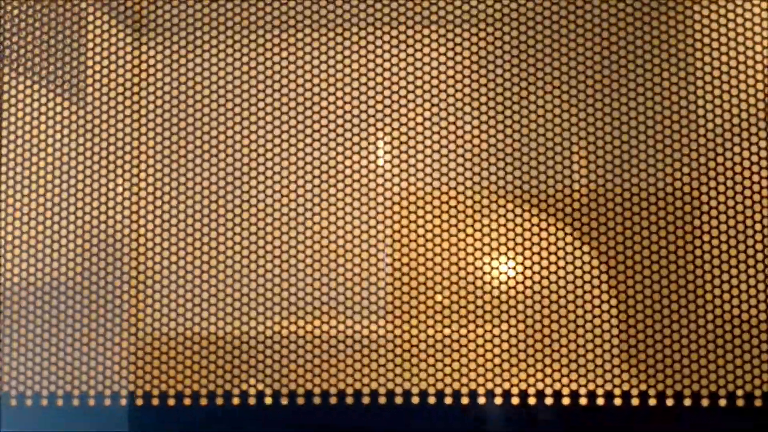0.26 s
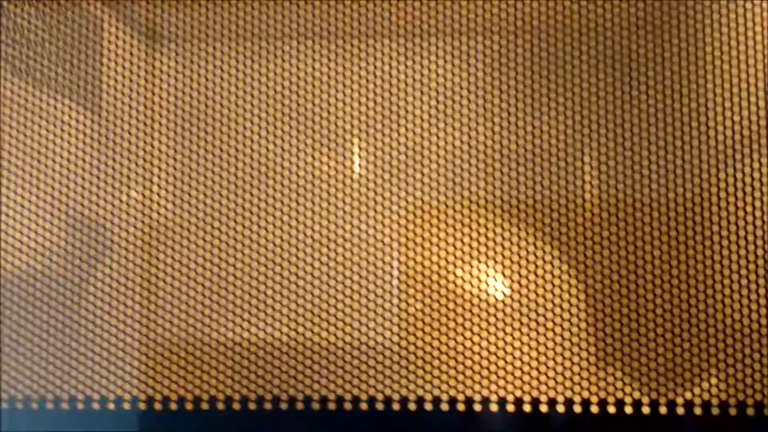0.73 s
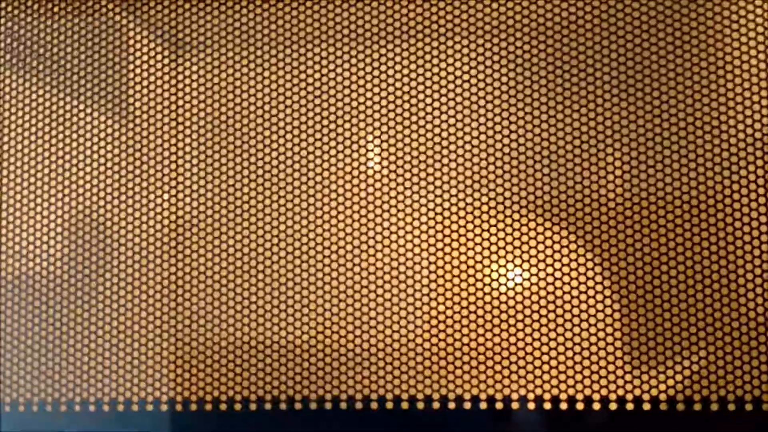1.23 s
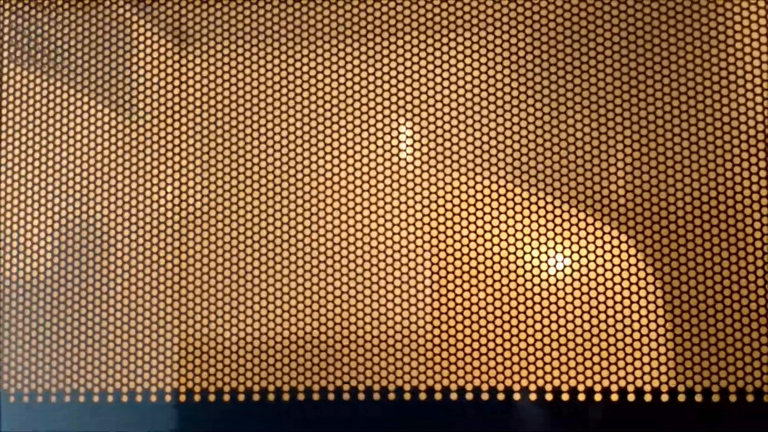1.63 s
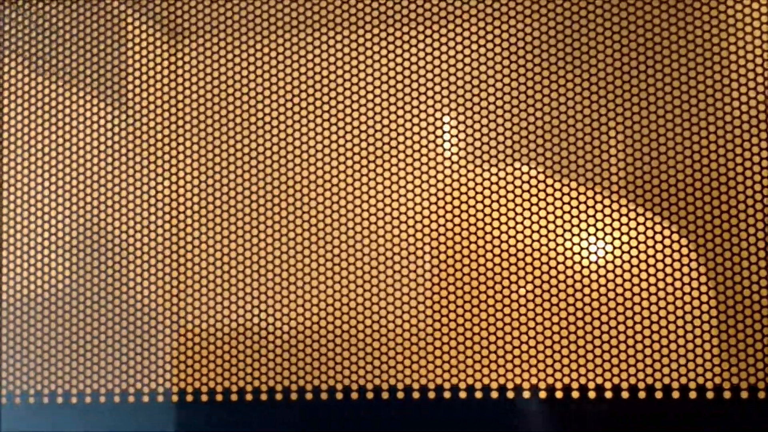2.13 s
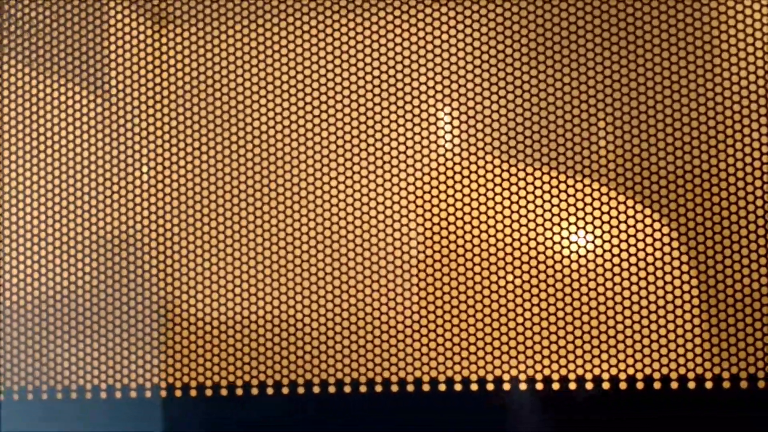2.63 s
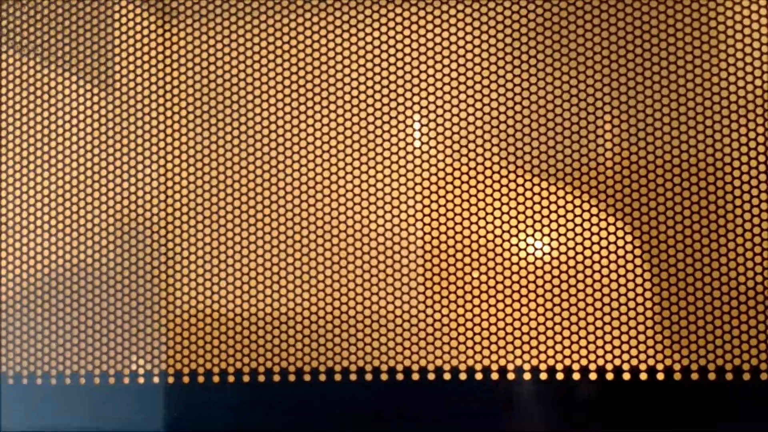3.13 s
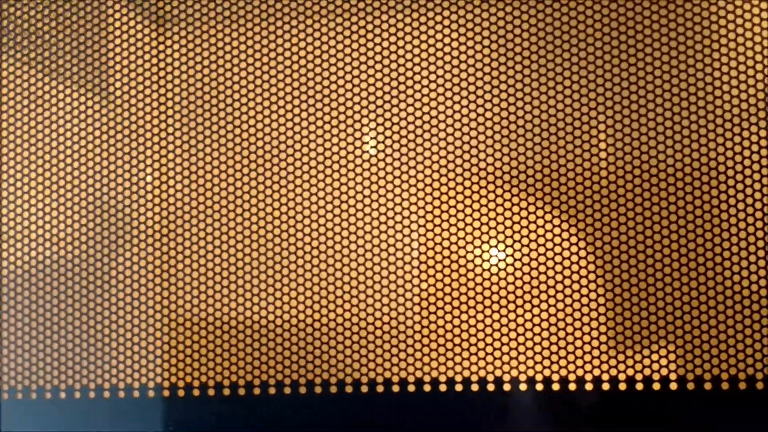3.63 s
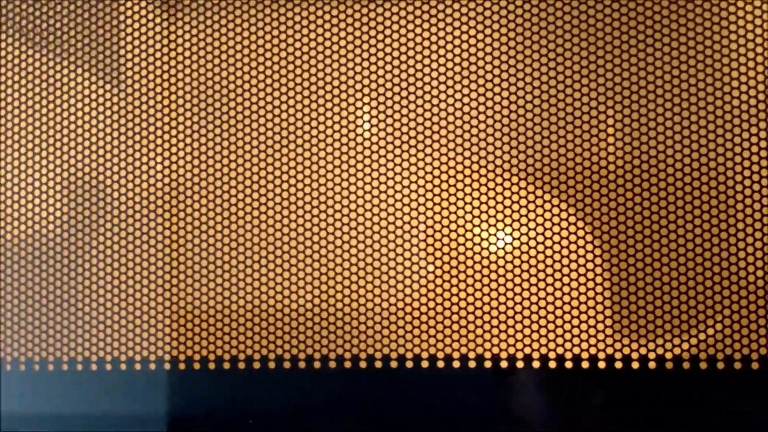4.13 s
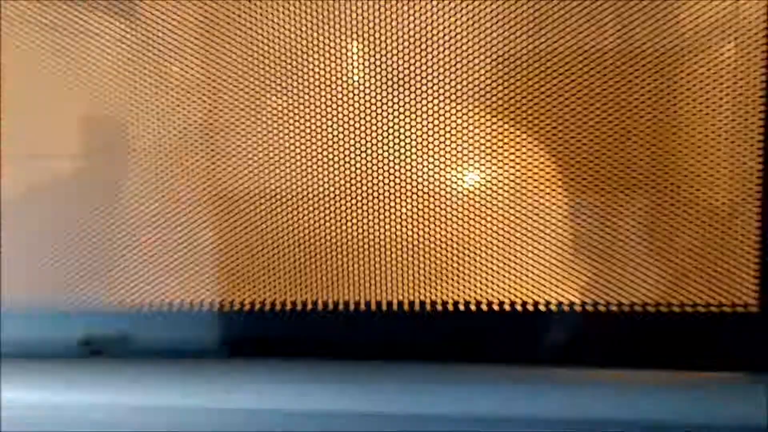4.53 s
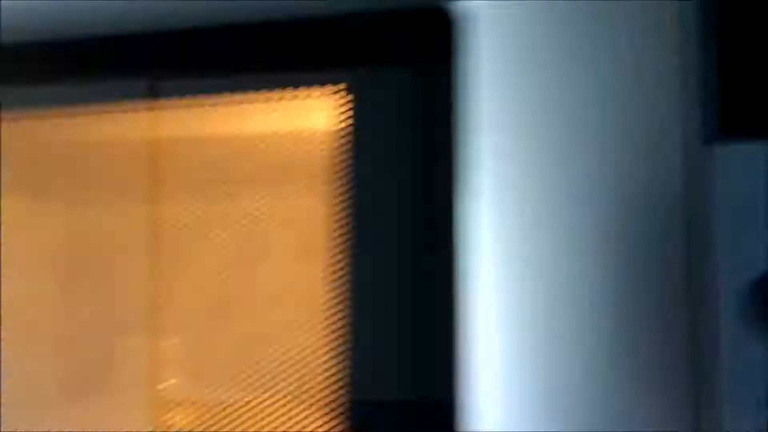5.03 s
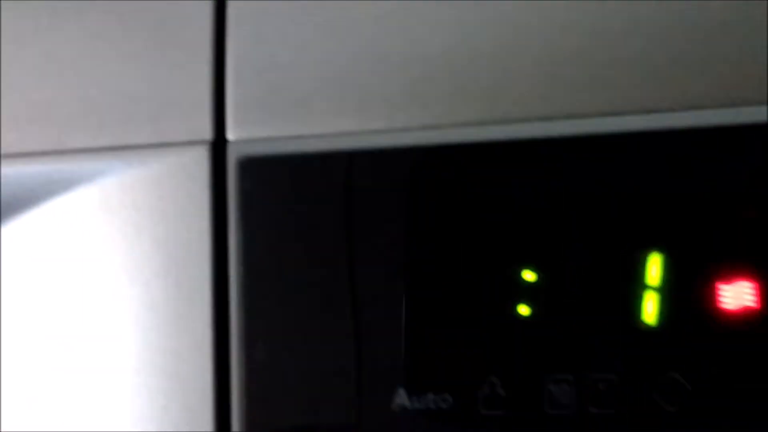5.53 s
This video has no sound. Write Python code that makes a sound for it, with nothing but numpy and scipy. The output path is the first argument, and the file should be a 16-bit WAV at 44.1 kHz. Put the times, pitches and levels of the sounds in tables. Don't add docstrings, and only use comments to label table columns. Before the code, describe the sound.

A stereo microphone near a running microwave catches a bright, buzzy transformer drone with fan whine and hiss at four times normal speed. Short metallic knocks and crackly sprays from a heated egg come singly and in clusters, loudest at the start. After the microphone moves away along the front, pitch falls instantly to true speed, leaving a deep, pulsing hum and dull airflow without pops.

```python
import sys
import numpy as np
from scipy import signal
from scipy.fft import rfft, irfft
from scipy.io import wavfile
from scipy.ndimage import uniform_filter1d

SR = 44100
rng = np.random.default_rng(int(sys.argv[2]) if len(sys.argv) > 2 else 0)


def gain_from_db(level_db):
    decades = np.asarray(level_db, float) / 20
    return 10 ** decades


def unload_wav(signal):
    wavfile.write(
        sys.argv[1],
        SR,
        np.round(np.clip(np.atleast_2d(signal).T, -1, 1) * 32767).astype(np.int16),
    )


N = 254456
STEPS = np.arange(0, N + 128, 128) / SR
FAST = 4
SWITCH_S = 5.306

# frequency in Hz, left and right level in dB per Hz.
FAST_AIR = [(60.3, -96.5, -93), (234, -89, -91), (342, -80.5, -82.5), (600, -71.5, -72),
            (713, -80.5, -83.5), (1044, -70, -68), (1500, -71.5, -67.5), (2070, -71.5, -67.5),
            (2630, -74, -73), (4000, -77.5, -77), (6130, -76.5, -77), (8800, -80, -79.5),
            (12500, -80.5, -80.5), (15500, -85, -85.5)]
# frequency in Hz, left and right level in dB per Hz.
SLOW_AIR = [(40, -82, -83.0), (80, -78, -79), (131, -64, -71), (250, -63.5, -66), (400, -79, -64),
            (704, -68, -69), (1020, -66.5, -65), (1130, -71.5, -71), (1900, -73.5, -73),
            (3530, -80.5, -80.5), (5870, -86.5, -87), (10500, -99.0, -99.0), (11500, -103.0, -103.0),
            (15000, -107, -107)]
# frequency in Hz, width in Hz, boost in dB.
DUCTS = [(850, 170, 5.5), (1984, 210, 3), (2526, 290, 4.5), (4200, 320, 3), (5920, 640, 3), (10800, 540, 2)]
# frequency in Hz, left lead in rad, likeness 0-1.
PORTS = [(30, 3.5, 0.62), (70, 2, 0.85), (115, 2, 0.96), (159, 1.6, 0), (220, 0.22, 0.88),
         (400, -0.1, 0.66), (696, 0.25, 0.6), (920, -0.5, 1), (1400, -2, 0.58), (1730, -.3, 0.85),
         (2150, -.3, 0.72), (2570, -.3, 0.87), (3500, -.3, 0.88), (8000, -.3, 1)]
PORT_DELAY_S = 24.8 / 44100

# frequency in Hz, left and right level in dB, left lead in rad.
SLOW_TONES = [(100.1, -38.0, -39.1, 2.5), (200.2, -40.0, -50.3, 0.3), (246.9, -49.2, -47.3, 0.9),
              (300.5, -41.1, -40.6, 0.1), (356.1, -58.4, -48.6, -0.2), (400.5, -40.0, -39.6, 0.0),
              (498.4, -47.1, -49.6, 0.7), (600.9, -39.5, -45.3, -0.2), (701.7, -53.8, -51.3, -0.8),
              (881.9, -51.9, -51.6, -0.5), (999.0, -51.9, -51.6, -0.6), (1201.4, -55.7, -54.7, -0.9)]
# time in seconds, frequency in Hz.
BUZZ_DRIFT = [(0, 400.35), (2.4, 400.39), (3.6, 400.49), (5.77, 400.5)]
# multiple of the buzz, left and right level in dB,
# left lead in rad, change in dB once the microphone is away.
CORE = [(1, -39.1, -38.1, 3.0, -4), (2, -61, -55, 0, 3), (3, -46.7, -41.6, 0.1, 0.5),
        (4, -33.4, -33.6, -0.3, -4), (5, -38.7, -34, 0, -8), (6, -48.1, -37.5, 0.5, 0.5),
        (7, -58, -52.6, -0.6, -3), (8, -48.2, -47.1, -0.4, -10.5), (10, -54.1, -54.2, -0.2, -3.5),
        (11, -56, -56.9, -0.7, 3), (12, -53.8, -53.9, -1, -2.5), (13, -56.5, -58.5, -1.2, -5.5),
        (20, -57.9, -57.7, 2.4, -0.5)]
# multiple of the buzz,
# left and right level in dB, left lead in rad, change in dB once away.
HALVES = [(2.5, -50.5, -52.3, 0.1, -1.5), (4.5, -55.4, -52.4, 0.4, -4), (33.5, -59.9, -60.1, -2.5, -7.5)]
BLADE_HZ = 705.65
# multiple of the blade rate, left and right level in dB,
# left lead in rad, change in dB once away.
FAN = [(1, -48.1, -48.4, 1.2, -1.5), (1.5, -56, -53.5, -0.1, -9), (2, -60.2, -45.7, 0, -2),
       (3, -46.4, -41.6, -0.7, -9.5), (4, -54.3, -60.5, 0.7, 2), (5, -55.3, -55.1, 0, -3),
       (7, -54, -54.1, -0.9, -5.5)]
# frequency in Hz, left and right level in dB,
# left lead in rad, change in dB once away.
BEATS = [(929.6, -51.2, -48.4, 0.2, 0), (977.5, -54.4, -50.3, 2.8, -1), (1459, -55, -53.6, -0.1, -1.5),
         (1683, -54.5, -53.3, -0.4, -2.5), (1955, -57.4, -50.9, 0, -3), (2049.7, -50.8, -52.9, -0.2, -3)]
# frequency in Hz, left-right change in dB
# once away, left and right change in dB at the panel, lead change in rad at the panel.
STEEP_TONES = [(400, 1.5, 0, 3.5, -0.71), (705, 4.5, 0, -5, 0.58), (800, 2, 14.5, 0, 0),
               (1200, 1.5, 9.5, 7, 0.091), (2002, -8, 2, -2, 0), (2116, -2, 3, -3, 0),
               (2402, 9, 2.5, 2.5, 0), (2770, -1, 15, 8, 0), (3203, -1, -8, -11, 0)]
RIPPLE_RAD, RIPPLE_RATE = 0.75, 1.35

AWAY_S, PANEL_S = (4.47, 4.63), (4.98, 5.144)
LEAN_S, LEAN_WIDTH_S, LEAN = 0.93, 0.42, 0.14
AIR_AWAY_DB, AIR_PANEL_DB = -1.8, -0.5
# time in seconds, level change in dB.
HAND_DRIFT = [(0, -1.5), (.7, -1.5), (1.4, 2), (2.6, -1.5), (3.7, 1.5), (4.2, -0.5), (4.62, -2), (4.95, -1),
              (5.3, -8.5)]

# start in seconds, strength in dB, place across the cavity as a share 0-1.
POPS = [(0.4576, -14.5, .48), (0.618, -30, .21), (1.31, -23, 0.14), (1.3936, -16, 0.3), (1.463, -28.5, .2),
        (1.575, -31, 0.31), (1.678, -19.5, .26), (2.154, -16.5, 0.077), (2.359, -19, .38),
        (2.576, -23.5, 0.41), (2.702, -33, .1), (2.881, -17.5, .43), (2.888, -28, 0.58),
        (2.8963, -20, 0.45), (2.9, -21, 0.076), (3.568, -19, .35), (3.899, -26, 0.36), (3.952, -18.5, 0.26),
        (4.844, -28.5, 0.41), (5.127, -21, .33)]
# start in seconds, shell ring level in dB, ring frequency in Hz,
# spray level in dB, fineness in dB (under 0 spit, over 0 fizz).
SPRAY = [(0.4608, -20, 3930, -15.5, -4), (0.6188, -25.5, 3830, -24, -7), (0.6874, -36, 4180, -30.5, -6),
         (0.7386, -34, 3990, -30, -6), (0.8063, -29.5, 3780, -30, -6), (1.309, -35, 3950, -20, -5.5),
         (1.3955, -23, 3980, -21, 5), (1.5743, -26, 4080, -19.5, 5), (1.678, -38, 4200, -17, 16),
         (2.156, -22.5, 4120, -18, 3.5), (2.361, -31, 3700, -19.5, -4), (2.366, -29, 4200, -21.5, -4),
         (2.5804, -34, 3940, -22.5, 7), (2.6988, -31.5, 3950, -29.5, 3), (2.8832, -24, 4090, -19, 1.5),
         (2.897, -22, 4240, -17.5, -6.5), (2.904, -29, 4220, -20, 7), (3.0593, -30, 4100, -30.5, -5),
         (3.246, -29, 4040, -31, 0), (3.5713, -21, 4080, -17.5, -1), (3.9003, -22.5, 4110, -20.5, -18),
         (3.9557, -24, 4140, -20, -6), (4.1949, -31, 4150, -33.5, 6)]
# frequency in Hz, width in Hz, left and right level in dB.
THUD = [(430, 65, -8.5, -14), (572, 73, -1, -3)]
# frequency in Hz, width in Hz, left and right level in dB.
LOW_KNOCK = [(697, 46, -7.5, -9.5), (873, 52, 1.5, 3.5)]
# frequency in Hz, width in Hz, left and right level in dB.
HIGH_KNOCK = [(1180, 74, 2.5, 5.5), (1410, 410, 6.5, -12), (1690, 220, -3, -16), (2480, 200, -11, -20)]
# frequency in Hz, width in Hz, left and right level in dB.
CRACK = [(1000, 610, 4, 5), (2270, 550, -3, -1.5), (3260, 2900, -27, -10)]
# frequency in Hz, width in Hz, left and right level in dB.
SPIT = [(6840, 350, -8, -19), (7820, 290, -5, -4.5), (8450, 1500, -14.5, -11)]
# frequency in Hz, width in Hz, left and right level in dB.
FIZZ = [(10810, 440, -11, -9), (12900, 870, -27, -8.5), (14000, 530, -12, -18.5)]
BLOW_LAG_S = 0.0015
ECHO_S = 0.0016
BURST_S = 0.0068
LEAK = 0.23
SPIT_RATIO = 2.06


def evened(x):
    return x / np.sqrt(np.mean(x ** 2) + 1e-20)


def columns(table, at):
    place, *values = np.transpose(table)
    return [np.interp(at, place, v) for v in values]


def wander(per_s, count):
    knots = rng.standard_normal((count, 400))
    return np.array([np.interp(STEPS * per_s, np.arange(len(k)), k) for k in knots])


def add(mix, s, sound):
    mix[:, round(s * SR):][:, :sound.shape[1]] += sound


def travel(t):
    lean = LEAN * np.exp(-((t - LEAN_S) / LEAN_WIDTH_S) ** 2)
    return np.interp(t, AWAY_S, [0, 1]), np.interp(t, PANEL_S, [0, 1]) + lean


def ports(hz, speed):
    lead, same = columns(PORTS, hz / speed)
    lead = np.minimum(lead, np.pi - 2 * np.pi * hz / speed * PORT_DELAY_S)
    same = 1 - (1 - same) * (0.42 + 0.78 * speed / FAST)
    return np.exp(-1j * lead), np.clip(same, 0, 1)


def air(table, speed, patchy_db, bumps=(), vent_db=0):
    frames, hz = N // 256 + 5, np.fft.rfftfreq(1024, 1 / SR)
    a, b, c, d, patches = rng.standard_normal((frames, 513, 5)).T
    patches = uniform_filter1d(patches, size=10, axis=0)
    patches = evened(uniform_filter1d(patches, size=12, axis=1))
    lag, same = (v[:, None] for v in ports(hz, speed))
    left = a + 1j * b
    right = lag * (same * left + np.sqrt(1 - same ** 2) * (c + 1j * d))
    logged = [(np.log(f), left_db, right_db) for f, left_db, right_db in table]
    level_db = np.array(columns(logged, np.log(hz + 1)))
    level_db = level_db + sum(db * np.exp(-(2 * (hz - f) / width) ** 2) for f, width, db in bumps)
    panel = np.dot([0.45, 0.6], travel(np.arange(frames) * 256 / SR))
    vent = np.outer(np.exp(-((hz - 3500) / 550) ** 2), panel)
    gain = gain_from_db(level_db[:, :, None] + patchy_db * patches + vent_db * vent)
    z = np.array([left, right]) * gain * np.sqrt(SR / 2) / 23.83
    return signal.istft(z, nperseg=1024, noverlap=768)[1][:, :N]


def locked(hz, buzz_hz):
    multiple = hz / buzz_hz
    near = abs(multiple - round(multiple)) * buzz_hz < 2
    return round(multiple) if near else multiple


def ripple(multiple):
    return RIPPLE_RAD * np.cos(RIPPLE_RATE * (multiple - 5)) / (2 * np.pi)


def tone(t, turns, left_db, right_db, lead):
    controls = gain_from_db(left_db), gain_from_db(right_db), lead
    left, right, lead = (np.interp(t, STEPS, v + 0 * STEPS) for v in controls)
    angle = 2 * np.pi * turns
    return np.sqrt(2) * np.array([left * np.sin(angle), right * np.sin(angle - lead)])


def slow_hum(t):
    buzz_hz = BUZZ_DRIFT[-1][1] / FAST
    quick, out = wander(12, count=len(SLOW_TONES)), 0
    for q, (hz, left_db, right_db, lead) in zip(quick, SLOW_TONES):
        multiple = locked(hz, buzz_hz)
        turns = multiple * buzz_hz * (t - 5.4) + ripple(multiple)
        out = out + tone(t, turns, left_db + 0.71 * q, right_db + 0.65 * q, lead)
    return out


def hum(t):
    buzz_hz = BUZZ_DRIFT[-1][1]
    sources = (CORE + HALVES, buzz_hz), (FAN, BLADE_HZ), (BEATS, 1)
    tones = [(k * unit, *row) for table, unit in sources for k, *row in table]
    cycles = np.cumsum(columns(BUZZ_DRIFT, t)[0]) / SR
    (away, panel), swing_db = travel(STEPS), columns(HAND_DRIFT, STEPS)[0]
    slow, quick = wander(3, count=len(tones)), wander(40, count=len(tones))
    out, moved = np.zeros((2, len(t))), travel(t)[0]
    for k, (hz, left_db, right_db, lead, away_db) in enumerate(tones):
        weak = np.clip((-29.5 - right_db) / 20, 0, 1)
        swings = (1100 < hz < 2200) * (abs(hz - 1600) > 20)
        sway = weak * (2.5 * slow[k] + 0.93 * quick[k]) + swing_db * swings
        steep = (np.array(row[1:]) for row in STEEP_TONES if abs(row[0] / hz - 1) < 0.004)
        tilt, left_panel, right_panel, turn = sum(steep, np.zeros(4))
        left_db = left_db + (away_db + tilt / 2) * away + left_panel * panel
        right_db = right_db + (away_db - tilt / 2) * away + right_panel * panel
        multiple = locked(hz, buzz_hz)
        door = (0.21 * multiple ** 2 + 0.5) % 1 - 0.5
        turns = multiple * cycles + moved * ripple(multiple) + (1 - moved) * door
        out += tone(t, turns, left_db + sway, right_db + sway, lead + turn * panel)
    return out


def ring(drive, modes):
    t, chance = np.arange(len(drive)) / SR, rng.standard_normal((4, 2))
    shapes = 0
    for (hz, width, left_db, right_db), (detune, change) in zip(modes, chance):
        gains = gain_from_db(np.array([left_db, right_db]) + 0.41 * change)
        wave = np.sin(2 * np.pi * hz * (1 + 0.012 * detune) * t)
        shapes = shapes + np.outer(gains, np.exp(-np.pi * width * t) * wave)
    out = signal.fftconvolve(shapes, drive[None], axes=1)[:, :len(t)]
    return out / abs(out).max()


def knock(t, place):
    crackle = rng.standard_normal(len(t)) * (rng.random(len(t)) < 0.12) * np.exp(-t / BURST_S)
    echo = t == t[round(ECHO_S * SR)]
    blow = 0.13 * crackle - (t == 0) - 0.71 * echo
    thud, low, high = np.hypot(np.sin(np.pi * place * np.arange(1, 4)), LEAK)
    out = thud * gain_from_db(-0.05) * ring(blow, THUD) + low * ring(blow, LOW_KNOCK)
    out = out + high * gain_from_db(1.4) * ring(blow, HIGH_KNOCK)
    return out + max(low, high) * gain_from_db(-3.0) * ring(blow, CRACK)


def spatter(t, ring_db, ring_hz, spray_db, fine_db):
    spray = rng.standard_normal((3, len(t))) * np.tanh(t / 0.00095) * np.exp(-t / 0.007)
    shell = [(ring_hz, 110, 0, 0), (ring_hz * 1.014, 160, -10, -10), (ring_hz * 1.14, 600, -4, -4)]
    spit = gain_from_db(-max(fine_db, 0)) * ring(spray[1], [(SPIT_RATIO * ring_hz, 300, 0, 0)] + SPIT)
    fizz = gain_from_db(min(fine_db, 0)) * ring(spray[2], FIZZ)
    return gain_from_db(ring_db + 1.5) * ring(spray[0] * np.exp(-t / 0.018), shell) + gain_from_db(spray_db) * (spit + fizz)


def pops():
    t, out = np.arange(2000) / SR, np.zeros((2, N))
    for s, strength_db, place in POPS:
        add(out, s + BLOW_LAG_S, gain_from_db(strength_db) * knock(t, place))
    for s, *droplets in SPRAY:
        add(out, s - 0.001, spatter(t, *droplets))
    out = signal.sosfilt(signal.butter(4, 340, "high", fs=SR, output="sos"), out)
    out = signal.sosfilt(signal.butter(6, 14500, fs=SR, output="sos"), out)
    lag = ports(np.fft.rfftfreq(N, 1 / SR), FAST)[0]
    return np.array([out[0], irfft(rfft(out[1]) * lag, N)])


def scene():
    t = np.arange(N) / SR
    fade = np.clip((t - SWITCH_S) / 0.0019 + 0.5, 0, 1)
    air_db = np.dot([AIR_AWAY_DB, AIR_PANEL_DB], travel(t))
    fast = air(FAST_AIR, FAST, 1.36, DUCTS, vent_db=8.5) * gain_from_db(air_db) + pops()
    slow = air(SLOW_AIR, 1, 2.0)
    fast[:, fade < 1] += hum(t[fade < 1])
    slow[:, fade > 0] += slow_hum(t[fade > 0])
    return fast * np.sqrt(1 - fade) + slow * np.sqrt(fade)


def band_limit(x):
    return signal.sosfilt(signal.butter(12, 15840, fs=SR, output="sos"), x)


def record(dry):
    peak_db = 10 * np.log10(uniform_filter1d((dry ** 2).mean(0), size=130) + 1e-12)
    fall = np.arange(N) * 30.0 / SR
    held_db = np.maximum.accumulate(peak_db + fall) - fall
    over_db = np.maximum(held_db + 20.0, 0)
    lagged = np.roll(uniform_filter1d(over_db, size=600), 450)
    return band_limit(dry * gain_from_db(-1.8 * lagged))


dry = scene()
out = record(dry)
unload_wav(out)
```